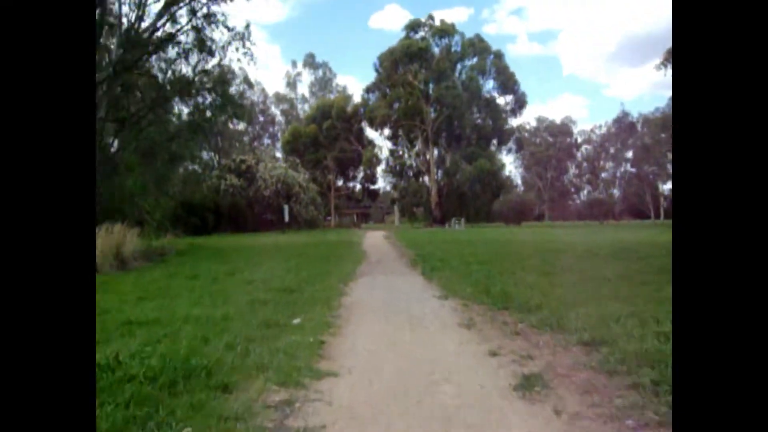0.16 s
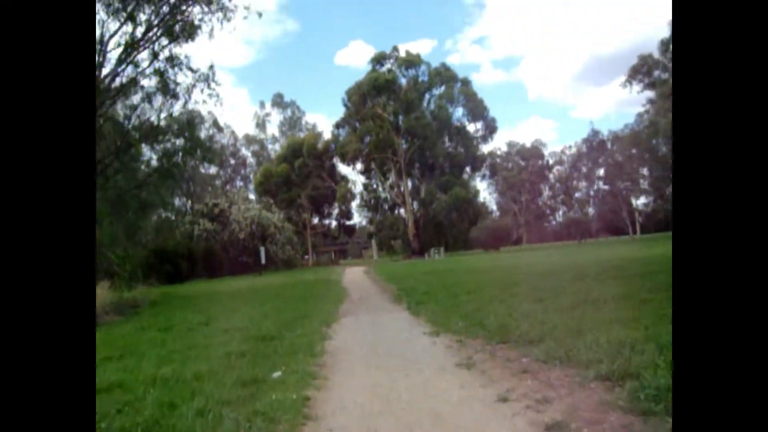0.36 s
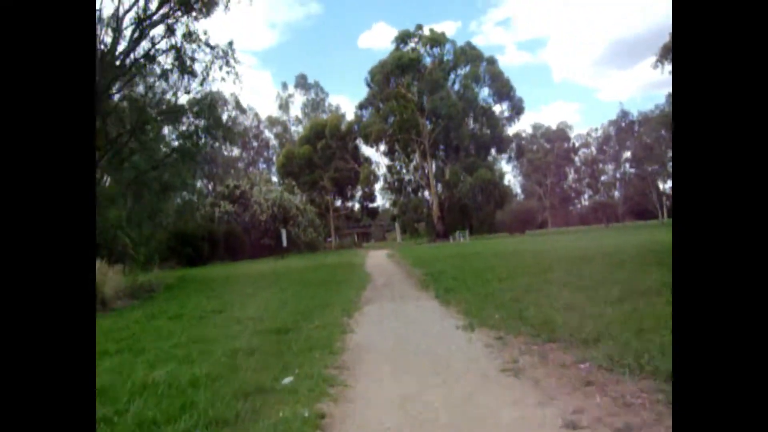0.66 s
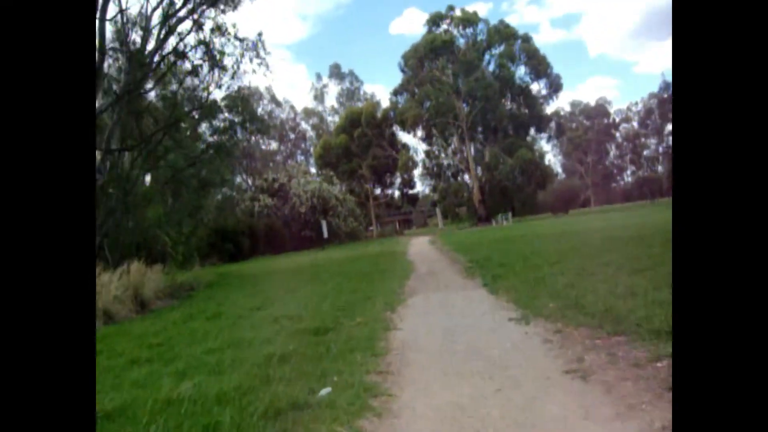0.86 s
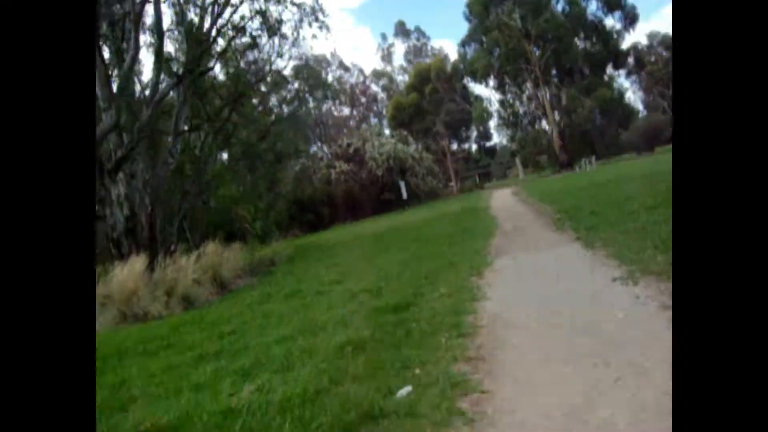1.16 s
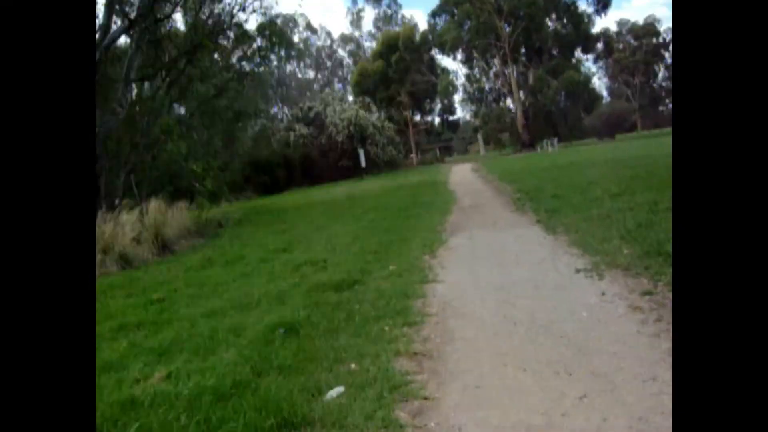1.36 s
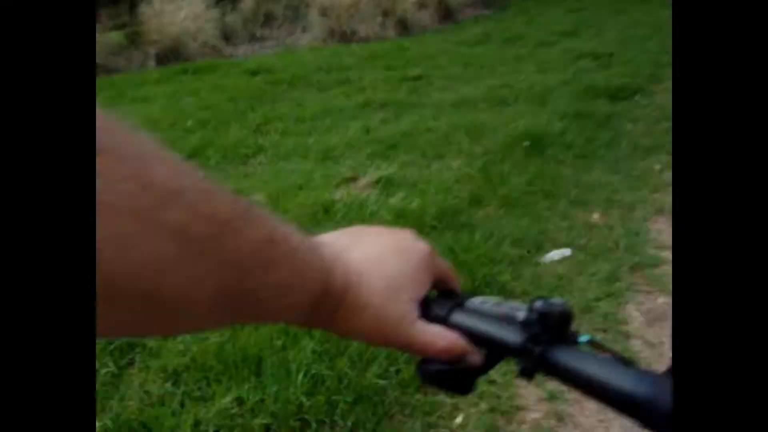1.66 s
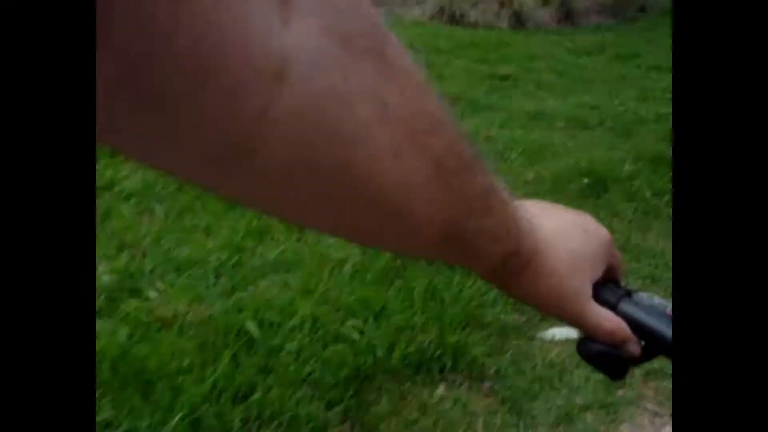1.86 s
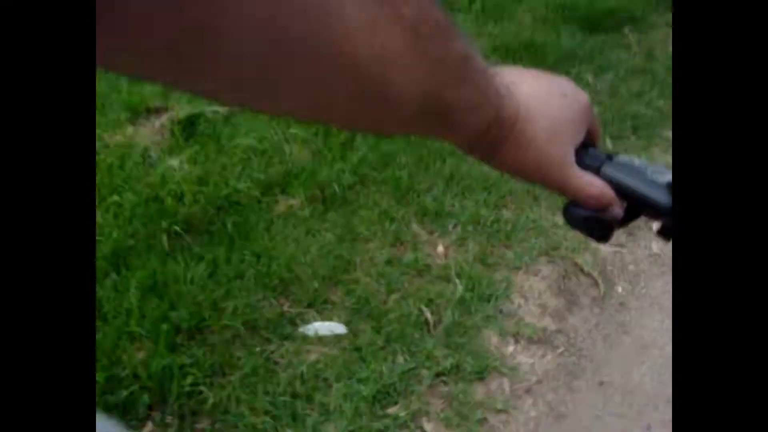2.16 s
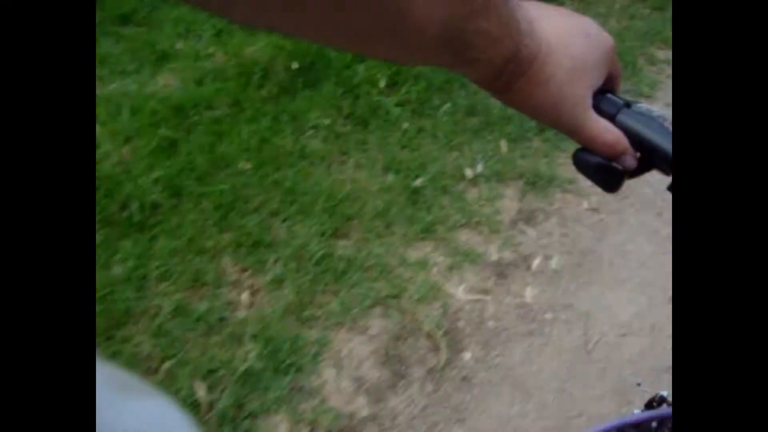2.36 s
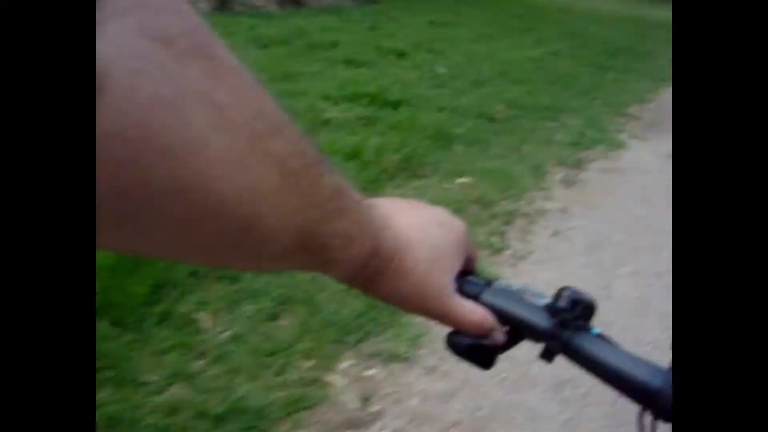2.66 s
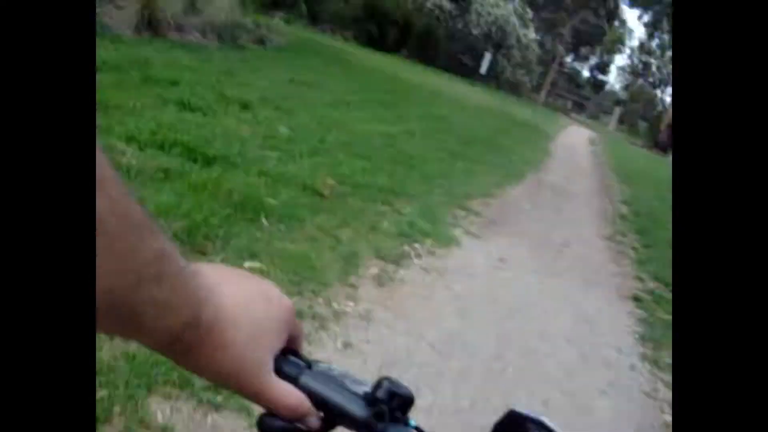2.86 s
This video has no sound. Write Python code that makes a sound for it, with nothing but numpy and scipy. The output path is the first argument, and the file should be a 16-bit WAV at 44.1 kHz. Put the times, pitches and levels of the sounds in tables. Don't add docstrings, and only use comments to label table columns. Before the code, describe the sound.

Bicycle tyres crunch continuously on gravel outdoors, with bright stone snaps and a few hard mount knocks; low rumble and wind puffs hit a cheap bike-mounted microphone whose level ducks after loud cracks.

```python
import sys
import numpy as np
from scipy import signal
from scipy.fft import rfft, irfft
from scipy.io import wavfile

SR = 44100
rng = np.random.default_rng(int(sys.argv[2]) if len(sys.argv) > 2 else 0)


def materialize(psi):
    bounded = np.clip(np.atleast_2d(psi).T, -1, 1)
    quanta = np.round(bounded * 32767).astype(np.int16)
    wavfile.write(sys.argv[1], SR, quanta)


def field_ratio(decibels):
    return 10 ** (np.asarray(decibels, dtype=float) / 20)


N = 132300

# t/s, level/dB, fine grit/dB, case ring/dB, coarse stones/dB
ROLLING = [(0, -25, 11, -0.5, 6.5), (.2, -17.5, 3.5, -18, 1), (.5, -18.5, 7, -8, 2),
           (.75, -16.5, 3.5, -7, 0.5), (.97, -16, 2, -8, 3.5), (1.22, -14, 0.5, -9.5, 1.5),
           (1.43, -18, 1, -25, -1.5), (1.52, -16, -10, -20, -6), (1.72, -16, -1, -8.5, -2),
           (1.97, -22.5, 10, 2, 1.5), (2.2, -25.5, 8, -1.5, 4.5), (2.35, -18.5, 10.5, -2.5, 2),
           (2.63, -20, 6.5, 0.5, 3), (2.68, -15.5, -7, 4.5, 6.5), (2.78, -28, -30.5, -3, 18.5),
           (2.85, -19, -20, -7.5, -3.5), (2.95, -21, -5, -1, 2), (3, -20, -13, 14, 4.5)]


def evened(x):
    return x / np.sqrt(np.mean(x ** 2) + 1e-20)


def curve(points, column):
    table = np.array(points)
    return np.interp(np.arange(N) / SR, table[:, 0], table[:, column])


def coloured(x, points):
    f, db = np.transpose(points)
    hz = np.fft.rfftfreq(N, 1 / SR)
    gain = field_ratio(np.interp(np.log(hz + 1), np.log(f + 1), db))
    return evened(irfft(rfft(x) * gain, N))


def drift(top_hz):
    hz = np.fft.rfftfreq(N, 1 / SR)
    lowpass = np.exp(-(hz / top_hz) ** 2) * (hz > 2)
    return evened(irfft(rfft(rng.standard_normal(N)) * lowpass, N))


def ring(hz, width_hz):
    t = np.arange(1500) / SR
    return np.exp(-np.pi * width_hz * t) * np.sin(2 * np.pi * hz * t)


def wavelet(hz, turns):
    t = np.arange(-.02, .02, 1 / SR)
    return np.exp(-(t * hz / turns) ** 2) * np.cos(2 * np.pi * hz * t)


def add(mix, start_s, sound):
    part = mix[max(round(start_s * SR), 0):][:len(sound)]
    part += sound[:len(part)]


def rumble():
    # f/Hz, gain/dB
    rumble_eq = [(12, -45), (20, 1.5), (81, 13), (215, 6), (451, -3), (513, 0), (600, -13), (780, -51),
                 (1320, -120)]
    lumps_db = 2.5 * drift(12)
    rolling_db = .5 * (curve(ROLLING, column=1) + 22)
    return field_ratio(-32 + lumps_db + rolling_db) * coloured(rng.standard_normal(N), rumble_eq)


def wind():
    # f/Hz, gain/dB
    dull_eq = [(12, -63), (25, -24.5), (95, -7), (135, 0.5), (220, -0.5), (330, -15.5), (700, -46.5),
               (1500, -93.5)]
    sharp_eq = [(40, -50.5), (120, -17.5), (240, 4), (380, -1.5), (560, -11.5), (900, -21), (1500, -38.5),
                (3000, -90)]
    # middle t/s, half length/s, level/dB, sharp share (0-1)
    puffs = [(0.064, 0.011, -30.5, 0.57), (0.217, 0.034, -25.5, 0.24), (0.418, 0.039, -22.5, 0.66),
             (0.516, 0.15, -24, 0.3), (0.613, 0.037, -11, 0.34), (0.666, 0.018, -8, 0.51),
             (.69, 0.013, -6, 0.66), (0.719, 0.0085, -15.5, 0.33), (.755, 0.021, -5.5, 0.41),
             (0.793, .018, -14.5, 0.3), (0.991, 0.092, -25, 0.35), (1.264, 0.047, -18, 0.31),
             (1.333, 0.008, -12, 0.35), (1.46, 0.013, -24, 0.33), (1.55, 0.089, -27.5, 0.43),
             (1.673, 0.013, -26, 0.77), (1.731, 0.031, -17, 0.54), (1.83, 0.0094, -26, 0.27),
             (1.971, 0.0052, -16.5, 0.76), (2.028, 0.026, -18, 0.44), (2.065, 0.0097, -10, 0.67),
             (2.088, 0.0052, -9.5, .5), (2.132, 0.023, -12.5, 0.38), (2.187, 0.022, -17, 0.47),
             (2.244, 0.016, -11.5, 0.56), (2.479, 0.013, -28, 0.5), (2.618, 0.011, -15, 0.36),
             (2.829, 0.014, -37, .3), (2.94, .025, -28.5, 0.44), (1.7, 0.034, -39, 0.2)]
    t = np.arange(N) / SR
    lumps = field_ratio(3.5 * drift(60.5))
    dull = lumps * coloured(rng.standard_normal(N), dull_eq)
    sharp = lumps * coloured(rng.standard_normal(N), sharp_eq)
    out = np.zeros(N)
    for middle_s, half_s, db, share in puffs:
        first = max(round((middle_s - 2 * half_s) * SR), 0)
        near = slice(first, round((middle_s + 2 * half_s) * SR))
        swell = np.exp(-abs((t[near] - middle_s) / half_s) ** 3)
        sharp_part = share * evened(swell * sharp[near])
        dull_part = (1 - share) * evened(swell * dull[near])
        out[near] += field_ratio(db) * (sharp_part + dull_part)
    return out


def thuds():
    # t/s, peak/dB, f/Hz
    pushes = [
        (0.435, -1.5, 302),
        (1.274, -4, 356),
        (2.063, -16, 323),
        (2.248, 3, 480),
        (2.652, -3.5, 360),
        (2.686, -9.5, 1400),
        (2.7304, 5.5, 630),
    ]
    tail_db, width_hz = -13.5, 117
    out = np.zeros(N)
    for s, db, hz in pushes:
        add(out, s - .02, field_ratio(db) * wavelet(hz, turns=0.43))
        tail = ring(hz * 0.815, width_hz) + ring(hz * 1.68, 2 * width_hz)
        add(out, s, field_ratio(db + tail_db) * tail)
    return out


def gravel():
    # f/Hz, gain/dB
    grit_eq = [(150, -52), (320, -7.5), (900, -2.5), (1900, -3.5), (3000, 0.5), (4000, 4), (5500, -3),
               (7000, -14)]
    # f/Hz, width/Hz, level/dB
    case_modes = [(2470, 260, -12), (3010, 180, -3), (3290, 294, -1), (4100, 850, 1.5)]
    grains_per_s, grain_spread_db, hiss_db = 2000, 3, -6
    cuts_per_s, swell_s, swell_db = 90, .007, 2.2
    coarse_hz, fine_hz = 1890, 4720
    hit, big, sign, which, cut, height = rng.random((N, 6)).T

    ramp = np.exp(-np.arange(3000) / SR / swell_s)
    cuts = height * (cut < cuts_per_s / SR)
    bed = signal.oaconvolve(cuts[::-1], ramp)[:N][::-1]
    bed_gain = field_ratio(swell_db * 2 * np.tanh(evened(bed - bed.mean()) / 2))

    size = field_ratio(grain_spread_db * np.minimum(-np.log(big + 1e-9), 4)) * np.sign(sign - .5)
    clicks = size * (hit < grains_per_s / SR)
    mode = (which * len(case_modes)).astype(int)
    rings = np.zeros(N)
    for k, (hz, width_hz, db) in enumerate(case_modes):
        rings += signal.oaconvolve(clicks * (mode == k), field_ratio(db) * ring(hz, width_hz))[:N]
    grit = coloured(evened(clicks) + field_ratio(hiss_db) * rng.standard_normal(N), grit_eq)

    level_db, fine_db, ring_db, coarse_db = (curve(ROLLING, k) for k in range(1, 5))
    crunch = grit + field_ratio(ring_db) * evened(rings)
    low = signal.oaconvolve(crunch, signal.firwin(61, coarse_hz, fs=SR), "same")
    low_mid = signal.oaconvolve(crunch, signal.firwin(61, fine_hz, fs=SR), "same")
    crunch = field_ratio(coarse_db) * low + (low_mid - low) + field_ratio(fine_db) * (crunch - low_mid)
    return field_ratio(level_db) * evened(bed_gain * crunch)


def snaps():
    # t/s, peak/dB, f/Hz
    stones = [(0.1025, -12.0, 2280), (0.1191, -8.0, 2220), (0.2675, -6.0, 2580), (0.2802, -8.0, 3530),
              (0.2892, -10.0, 4110), (0.5479, -7.0, 2280), (0.7365, -9.0, 3700), (0.7423, -10.0, 3790),
              (1.0831, -5.0, 2950), (1.088, -5.0, 2800), (1.379, -8.0, 3660), (1.411, -9.0, 2330),
              (1.5157, -8.0, 4090), (1.5422, -9.0, 4030), (1.6052, -8.0, 4220), (1.742, -5.0, 2820),
              (1.7623, -6.0, 2760), (1.7878, -7.0, 2930), (1.9057, -9.0, 2860), (1.9093, -5.0, 2800),
              (2.0463, -10.0, 2910), (2.1413, -7.0, 3210), (2.1863, -8.0, 3040), (2.2098, -8.0, 3140),
              (2.4165, -11.0, 3010), (2.6507, -6.0, 2970), (2.6866, -6.0, 3900), (2.7301, -14.0, 1810),
              (2.8545, -10.0, 2780), (2.9756, -5.0, 3290)]
    snap_db, width_hz, chip_db = 6, 800, -20
    before_s, after_s = .0012, .001
    t = np.arange(-.02, .02, 1 / SR)
    shape = np.exp(np.where(t < 0, t / before_s, -t / after_s))
    crack = np.arange(len(t)) == len(t) // 2
    out = np.zeros(N)
    for s, db, hz in stones:
        chips = field_ratio(chip_db) * rng.standard_normal(len(t)) * shape
        snap = np.convolve(chips + crack, ring(hz, width_hz))
        add(out, s - .0202, field_ratio(db + snap_db) * snap)
    return out


def gain_control():
    # t/s, depth/dB (negative = lift)
    drops = [(0.289, 13), (0.558, 3.5), (0.743, 5), (1.09, 12), (1.382, 4.5), (1.418, 4), (1.446, -6),
             (1.548, 4.5), (1.795, 6.5), (1.913, 5.5), (2.4, 11.5), (2.655, 11.5), (2.69, 16.5), (2.733, 6),
             (2.979, 14)]
    recover_s = 0.098
    t = np.arange(N) / SR
    drop_db = np.zeros(N)
    for s, db in drops:
        drop_db += db * (t > s) * np.exp(-np.maximum(t - s, 0) / recover_s)
    return field_ratio(-drop_db)


def scene():
    steady = gain_control() * (rumble() + gravel())
    return (steady + wind() + thuds() + snaps())[None]


def roll_off(x):
    return signal.sosfilt(signal.butter(12, 16400, fs=SR, output="sos"), x)


def record(dry):
    knee, floor_db, step, edge_hz = .85, -48.5, 4, 15800
    x = signal.oaconvolve(dry[0], signal.firwin(61, 6000, fs=SR), "same")
    over = np.maximum(abs(x) - knee, 0)
    x = np.sign(x) * (np.minimum(abs(x), knee) + (1 - knee) * np.tanh(over / (1 - knee)))
    x = x - .005
    x = x + field_ratio(floor_db) * rng.standard_normal(N)
    x = np.interp(np.arange(N), np.arange(0, N, step), x[::step])
    x = signal.oaconvolve(x, signal.firwin(511, edge_hz, window=("kaiser", 7), fs=SR), "same")
    return roll_off(x[None])


dry = scene()
out = record(dry)
materialize(out)
```